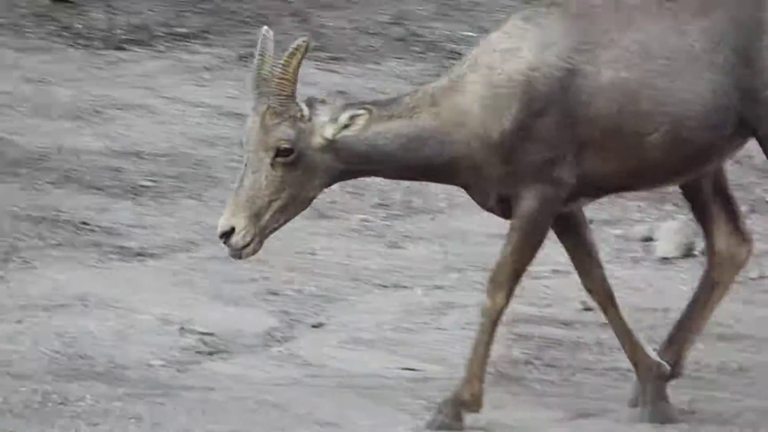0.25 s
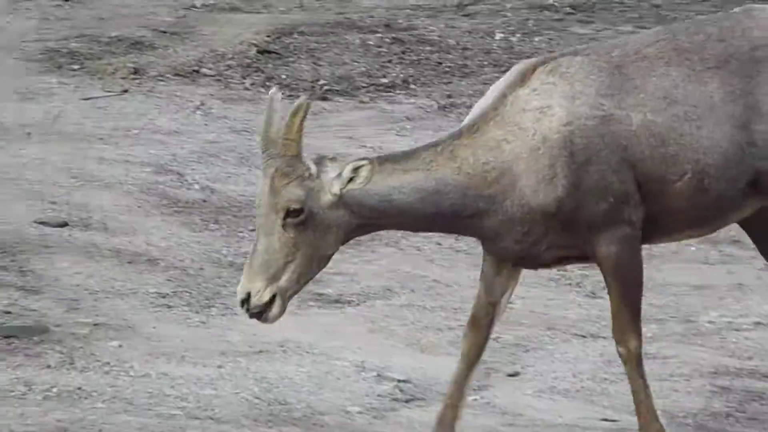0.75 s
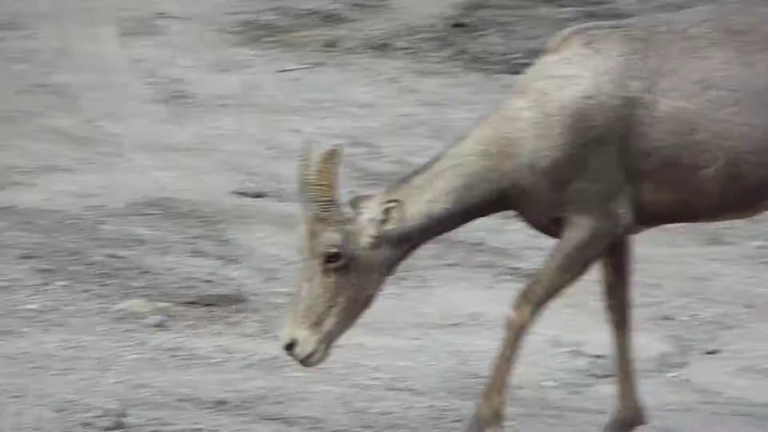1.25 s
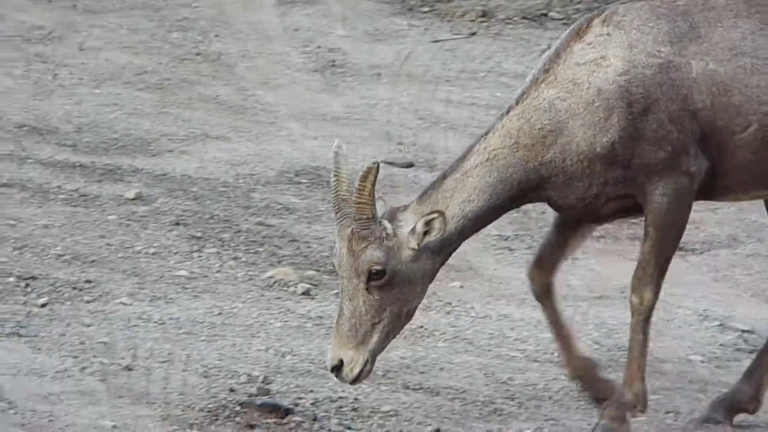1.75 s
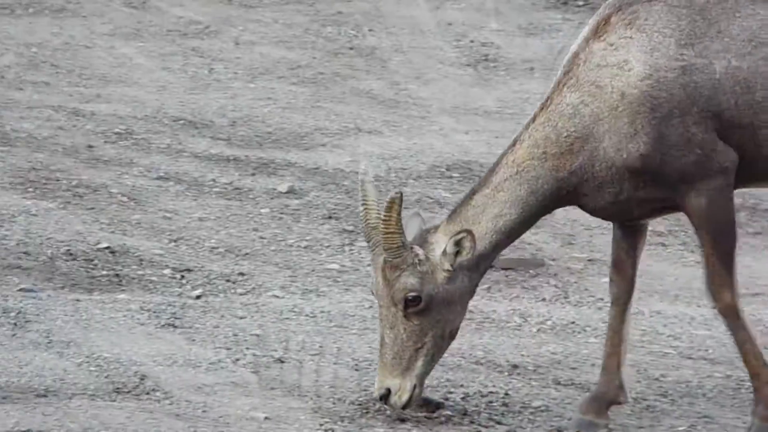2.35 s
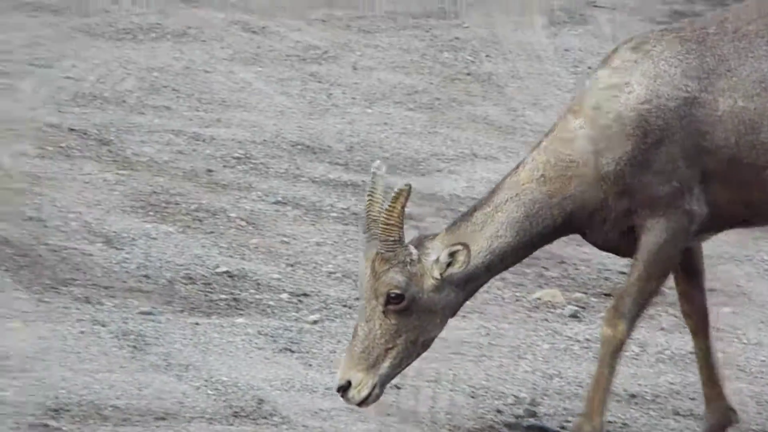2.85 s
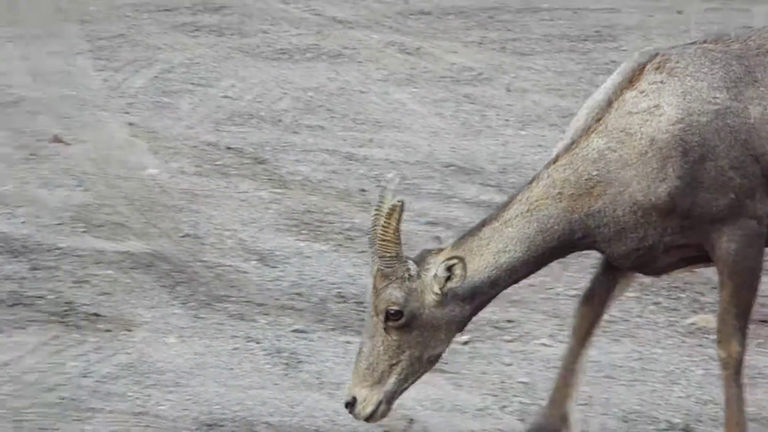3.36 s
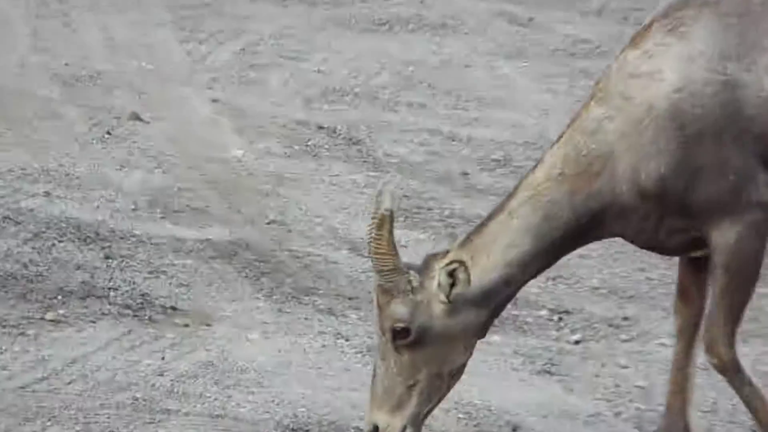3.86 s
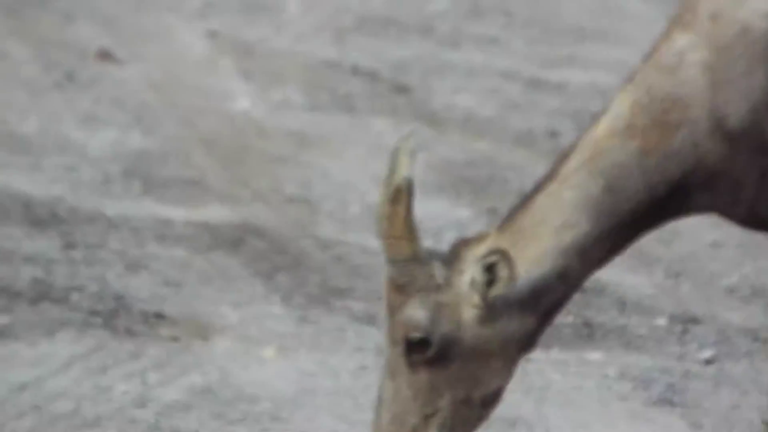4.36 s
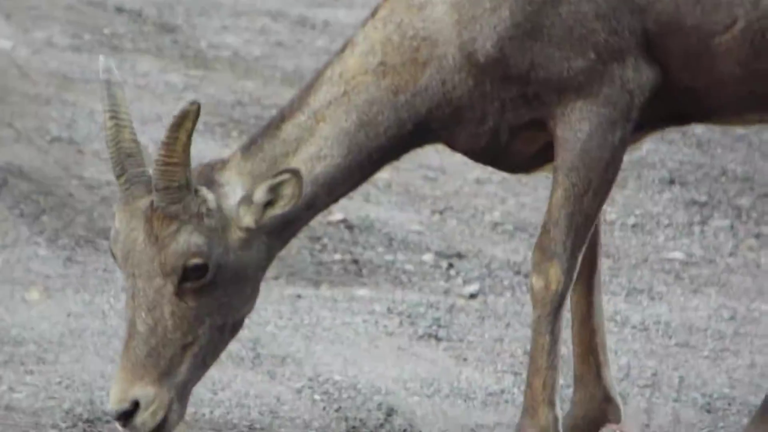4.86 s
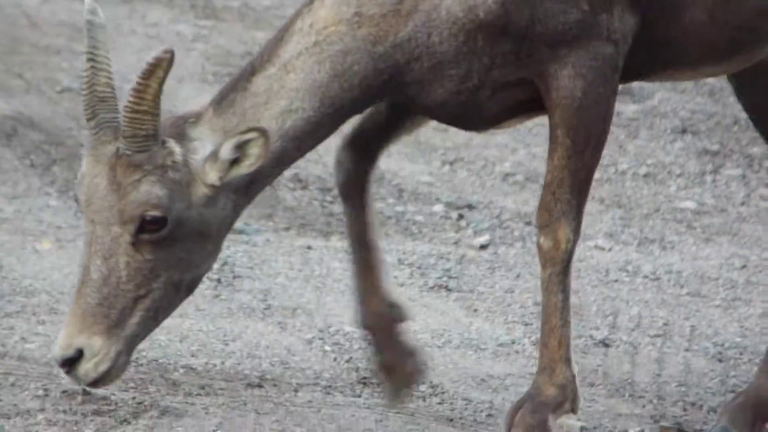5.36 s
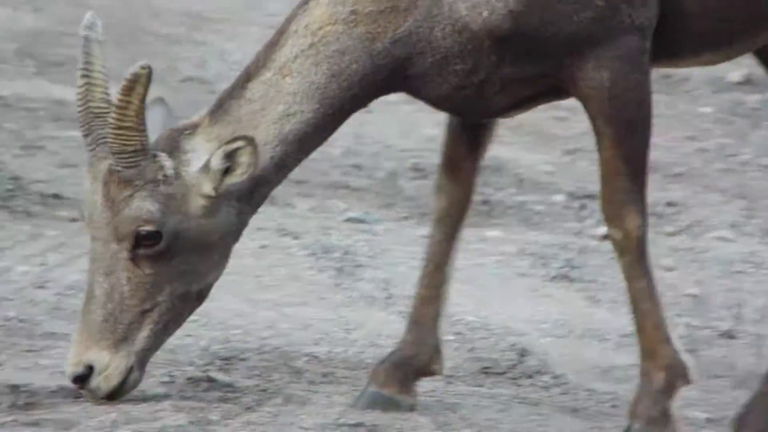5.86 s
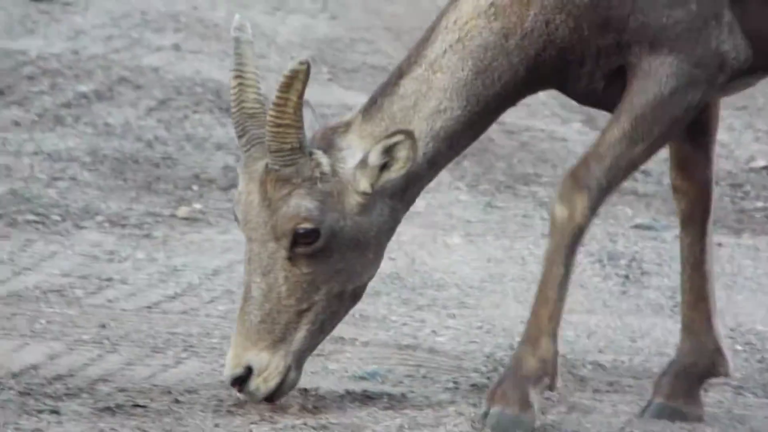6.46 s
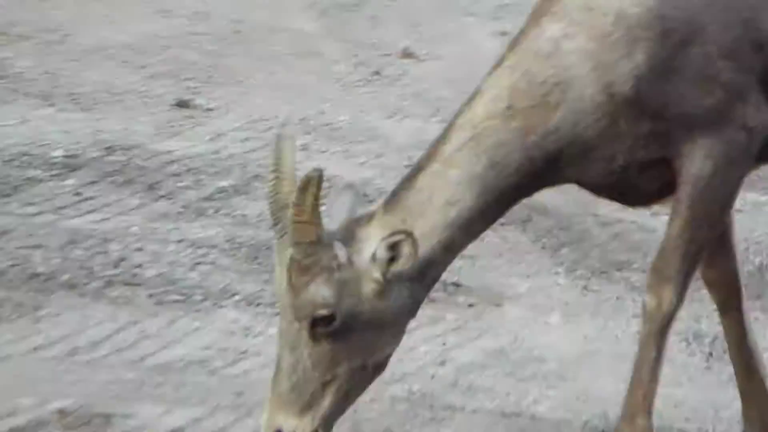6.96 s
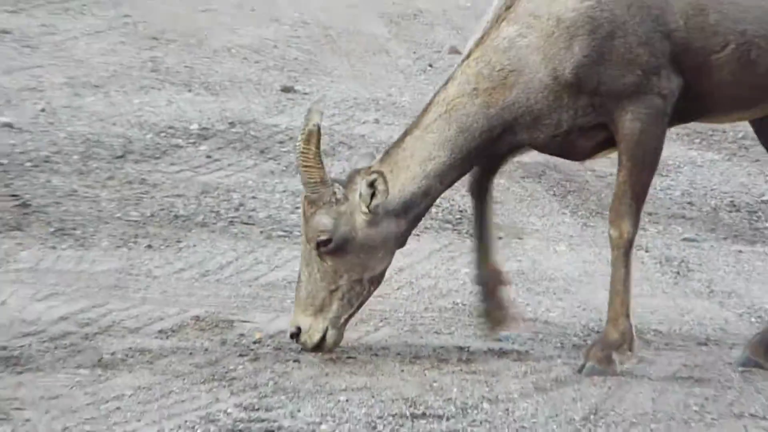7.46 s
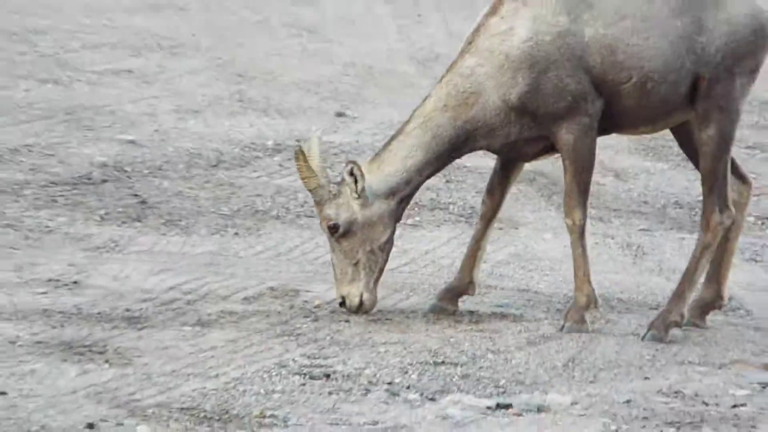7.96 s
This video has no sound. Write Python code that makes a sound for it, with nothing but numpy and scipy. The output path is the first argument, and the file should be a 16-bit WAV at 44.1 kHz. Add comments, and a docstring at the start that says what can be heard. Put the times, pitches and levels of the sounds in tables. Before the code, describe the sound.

A small camera's zoom motor whirs briefly, then longer, amid sharp plastic clicks, creaks and finger rubs over faint distant traffic outdoors.

```python
"""A zoom motor whirs twice, briefly and then for longer, throbbing with each turn of a gear in a
hand-held camcorder. The case clicks, creaks, rubs and bumps; far traffic murmurs and a bird chirps faintly.
Noise through resonators makes the motor, case, fingers and bird; spectrally shaped noise makes the road.
Gain control ducks the loud clicks and a low-pass removes the top."""
import sys
import numpy as np
from scipy import signal
from scipy.fft import rfft, irfft
from scipy.io import wavfile
from scipy.ndimage import uniform_filter1d, minimum_filter1d, map_coordinates

SR = 44100
rng = np.random.default_rng(int(sys.argv[2]) if len(sys.argv) > 2 else 0)


def master(y):
    """Save y as 16-bit WAV."""
    cut = np.clip(np.atleast_2d(y).T, -1, 1)
    pcm = np.round(cut * 32767)  # scale
    wavfile.write(sys.argv[1], SR, pcm.astype(np.int16))


N = 362061
T = np.arange(N) / SR


def from_db(db):
    """Decibels to gain."""
    return 10 ** (np.asarray(db) / 20)


def rms_one(x):
    """Scale to unit rms."""
    return x / np.sqrt(np.mean(x ** 2) + 1e-20)


def at_hz(points, hz):
    """Read a spectrum on a log-frequency axis."""
    point_hz, value = np.transpose(points)
    return np.interp(np.log(hz + 1), np.log(point_hz), value)


def resonate(x, hz, width_hz):
    """Two equal resonators in series: steep skirts, gain 1 on top."""
    r = np.exp(-np.pi * width_hz / SR)
    gain = (1 - r * r) / 2
    section = [gain, 0, -gain, 1, -2 * r * np.cos(2 * np.pi * hz / SR), r * r]
    return signal.sosfilt([section, section], x + 1e-18)


def to_stereo(mid, side, alike):
    """Weight equal-power mid and side so that the channels correlate by alike."""
    return np.sqrt(1 + alike) * mid + np.sqrt(1 - alike) * side * [[1], [-1]]


def pair(size, alike):
    """White noise at the two microphones, partly shared."""
    mid, side = rng.standard_normal((2, size))
    return to_stereo(mid, side, np.clip(alike, -1, 1)) / np.sqrt(2)


def pan(db):
    """Channel gains for a left-over-right difference."""
    return from_db(np.array([[db], [-db]]) / 2)


def add(out, start_s, sound):
    """Mix a sound in at start_s, cut at the end of the scene."""
    i = max(round(start_s * SR), 0)
    out[:, i:i + sound.shape[-1]] += sound[..., :max(N - i, 0)]


def road(start_db=-54.1, fade_db_per_s=.1, drone_hz=119, drone_db=-68):
    """Distant tyres and air as an even, slowly receding murmur, with one engine droning in it."""
    # murmur spectrum: (frequency [Hz], relative level [dB])
    spectrum = [(15, -29.5), (25, 1.5), (91, -4), (119, -5.5), (221, -3.5), (289, -6.5), (399, -7.5),
                (457, -9.5), (552, -8.5), (804, -10), (2630, -23.5), (4380, -27.5), (5430, -25.5),
                (8580, -35.5), (15500, -36)]
    # correlation of the two microphones: (frequency [Hz], correlation [1])
    likeness = [(30, .35), (60, 0.3), (130, .88), (300, 0.9), (700, 0.94), (1400, 0.96), (3100, 0.74),
                (6800, 0.57), (15000, .5)]
    hz = np.arange(N // 2 + 1) * SR / N
    alike = np.clip(at_hz(likeness, hz), 0, 1)
    mid, side = rfft(rng.standard_normal((2, N))) * from_db(at_hz(spectrum, hz))
    murmur = rms_one(irfft(to_stereo(mid, side, alike), N))
    murmur = murmur * from_db(start_db - fade_db_per_s * T)
    drone = rms_one(resonate(rng.standard_normal(N), drone_hz, width_hz=28))
    return (murmur + from_db(drone_db) * drone) * pan(1.4)


def bird(hz=5330, width_hz=650, rise_s=.02, tail_s=.045):
    """Thin far chirps at an even pace: narrow-band noise that swells and dies away exponentially."""
    # bouts: (first chirp [s], gap [s], chirps [count], peak envelope level [dB])
    bouts = [(.55, .425, 6, -66), (4.76, .365, 3, -68)]
    swell = np.zeros(N)
    for first_s, gap_s, count, db in bouts:
        for k in range(round(count)):
            peak_s = first_s + gap_s * k
            swell += from_db(db) * np.exp(-np.maximum((peak_s - T) / rise_s, (T - peak_s) / tail_s))
    return swell * rms_one(resonate(pair(N, alike=0.74), hz, width_hz))


def case(x, body_db=0, edge_db=0):
    """The plastic shell rings in all its modes; the touched spot favours the low or the high ones."""
    # shell modes: (frequency [Hz], width of each resonator [Hz], level before spot colour [dB])
    shell_modes = [(700, 1100, -21.5), (1673, 850, -2.5), (2200, 790, -3), (2790, 730, -4.5),
                   (3260, 570, -7), (4300, 1200, -4.5), (5890, 1200, 0), (6630, 1100, 2.5),
                   (7190, 1200, -2), (9540, 2200, -14.5), (12700, 2200, -24), (13600, 2200, -24.5)]
    out = 0
    for k, (hz, width_hz, db) in enumerate(shell_modes):
        spot_db = np.interp(hz, [2200, 3200, 7200, 9600], [body_db, 0, 0, edge_db])
        spot_db = spot_db + .8 * rng.standard_normal()
        polarity = (-1) ** k
        out = out + polarity * from_db(db + spot_db) * resonate(x, hz, width_hz)
    return out


def rubs_and_knocks(squeak_gain=1.5, squeak_width_hz=700, edge_db=-2.0, knock_t60_s=0.035):
    """Skin drags over the shell in tiny slips with a thin squeak, and now and then bumps it softly; a short
    whir also sounds as the motor starts."""
    # fingers rubbing the case, and last the motor's start-up whir: (start [s], length [s], rms before fades
    # [dB], squeak [Hz])
    rubs = [(3.048, 0.065, -50.5, 6850), (3.13, 0.034, -46, 6600), (4.38, 0.17, -68, 5900),
            (5.76, 0.15, -66, 6000), (5.915, 0.11, -68, 6700), (6.01, .26, -76, 6250),
            (6.637, 0.13, -50.5, 1800)]
    # soft knocks: (start [s], frequency [Hz], level before decay [dB])
    knocks = [(3.654, 480, -43), (3.725, 503, -37), (5.754, 600, -36), (6.151, 180, -33),
              (6.203, 302, -38.5), (6.265, 378, -37.5)]
    out = np.zeros((2, N))
    for start_s, length_s, db, squeak_hz in rubs:
        size = int(length_s * SR)
        slips = pair(size, alike=.4) * from_db(7 * rng.standard_normal(size))
        squeak = squeak_gain * resonate(slips, squeak_hz, squeak_width_hz)
        rub = case(slips, edge_db=edge_db) + squeak
        add(out, start_s, from_db(db) * rms_one(rub) * signal.windows.tukey(size, .3))
    t = np.arange(SR // 8) / SR
    for start_s, hz, db in knocks:
        thud = rms_one(resonate(rng.standard_normal(len(t)), hz, hz / 2))
        add(out, start_s, from_db(db - 60 * t / knock_t60_s) * thud)
    return out


def snap(db, body_db, edge_db, rattle=0.42, alike=0.05, t60_s=.015, ports_alike_hz=1650):
    """A seam slips with a snap and a few milliseconds of rattle; each spot has its own dull or sharp colour."""
    t = np.arange(2048) / SR
    impulse = (t == 0) * 2
    force = impulse + rattle * pair(len(t), alike) * from_db(-60 * t / t60_s)
    ring = case(force, body_db, edge_db)
    mid = ring.mean(axis=0)
    # low pitches reach both microphones alike
    high_pass = signal.butter(4, ports_alike_hz, "high", fs=SR, output="sos")
    side = signal.sosfilt(high_pass, ring - mid)
    return rms_one(mid + side) * from_db(db) * pan(-1.8)


def clicks(ticks_per_s=1.5, tick_db=-70, tick_spread_db=2.0, tick_body_db=3.0, tick_edge_db=0.0):
    """Single snaps of the case, with faint ticks of the case in the hand at random times."""
    # clicks: (start [s], rms before pan [dB], body colour [dB], edge colour [dB])
    click_rows = [(0.884, -62, 13.5, -6), (1.926, -42, 4, -13), (2.2458, -63, -2.5, -10),
                  (2.4781, -61, 15, -9), (2.8563, -54, 17.5, -18), (2.9115, -41.5, -3, -1),
                  (2.9794, -56, 7, -7), (3.1632, -46, 11, -20), (3.236, -31.3, -1.5, 5),
                  (3.5798, -31.5, -7.5, 5), (4.125, -17.3, -4, 0), (4.1321, -31, 6.5, -2),
                  (4.2713, -46.5, 3, -5), (5.7538, -33.5, 4.5, 1), (6.0064, -35, -4, 7),
                  (6.0744, -39.5, -4.5, 9), (6.2089, -35.3, -7, 3), (6.273, -55, 10.5, -7),
                  (6.5098, -62, -6, 7), (6.6745, -42.5, 0, -8), (6.8864, -55, 4.5, 0)]
    out = np.zeros((2, N))
    for start_s, db, body_db, edge_db in click_rows:
        add(out, start_s, snap(db, body_db, edge_db))
    for start_s in rng.uniform(0, N / SR, round(ticks_per_s * N / SR)):
        db = tick_db + tick_spread_db * rng.standard_normal()
        add(out, start_s, snap(db, tick_body_db, tick_edge_db))
    return out


def creaks(slip_gap_s=.0218, slowing_power=5.5, swell_db=2.2, spread_db=1.2):
    """A pressed seam sticks and slips: hardest in the middle of the push, and more slowly towards its end."""
    # creaks: (start [s], first to last slip [s], slips [count], level before swell and spread [dB],
    #          body colour [dB], edge colour [dB])
    creak_rows = [(2.9908, 0.1363, 4, -41, -4.5, -1.5), (5.915, 0.3387, 14, -42.8, -3, 3.5)]
    out = np.zeros((2, N))
    for start_s, length_s, slips, db, body_db, edge_db in creak_rows:
        along = np.linspace(0, 1, round(slips))
        even_s = slip_gap_s * (len(along) - 1)
        times_s = start_s + even_s * along + (length_s - even_s) * along ** slowing_power
        levels_db = db + swell_db * np.sin(np.pi * along) + spread_db * rng.standard_normal(len(along))
        for slip_s, slip_db in zip(times_s, levels_db):
            add(out, slip_s, snap(slip_db, body_db, edge_db))
    return out


def motor_drive(t, run_db, sag_db, surge_db=3.0, surge_s=.03, sag_s=.06, run_up_s=.006, run_down_s=.025):
    """The motor kicks off, sags as it takes up the lens, and runs down at the end."""
    surge = surge_db * np.exp(-t / surge_s)
    sag = sag_db * t / sag_s * np.exp(1 - t / sag_s)
    ramp = np.minimum(np.minimum(t / run_up_s, (t[-1] - t) / run_down_s), 1)
    return from_db(run_db + surge - sag) * ramp


def zoom(run, modes, mesh_db=2.5, flutter_db=2.1, null_hz=3900, null_width_hz=120):
    """Gear teeth scrape and shake the housing; an off-centre wheel loads them once a turn."""
    start_s, stop_s, run_db, sag_db, turns_per_s, start_turn = run
    t = np.arange(0, stop_s - start_s, 1 / SR)
    drive = motor_drive(t, run_db, sag_db)
    turn = 2 * np.pi * (turns_per_s * t + start_turn)
    slack = np.cumsum(rng.standard_normal(len(t))) * 0.051  # backlash blurs the tooth rhythm
    teeth = np.cos(29 * turn + slack)
    shaft = np.cos(5 * turn)
    climb = signal.sawtooth(turn + np.pi)  # pitch climbs and drops back every turn
    out = np.zeros((2, N))
    for hz, width_hz, db, throb_db, sweep in modes:
        scrape = pair(len(t), alike=.25) * from_db(mesh_db * teeth)
        ring = resonate(scrape, hz, width_hz)
        # each mode squeals at a nearly even height
        ring = ring / (uniform_filter1d(ring ** 2, size=128) + 1e-9) ** (1 / 3)
        bent = np.cumsum(1 + sweep * climb)  # warped read positions, in samples
        ring = np.array([map_coordinates(channel, [bent], order=3, mode="mirror") for channel in ring])
        ring = ring * from_db(flutter_db * shaft + throb_db * np.cos(turn))
        add(out, start_s, from_db(db) * drive * rms_one(ring))
    # the housing has a dead band between its low and high modes
    b, a = signal.iirnotch(null_hz, null_hz / null_width_hz, fs=SR)
    return signal.lfilter(b, a, out + 1e-18) * pan(4.0)


def scene():
    """The camera's own noises lie close and dry over the outdoor air."""
    # motor runs: (start [s], stop [s], drive level [dB], sag under load [dB], gear speed [turns/s],
    #              gear angle at the start [turns])
    run_in = (3.636, 4.332, -46.6, 1.0, 17.8, 0.32)
    run_out = (6.639, 8.22, -44, 4.5, 18.55, 0.14)
    # housing modes by direction of travel: (frequency [Hz], width of each resonator [Hz], level [dB],
    #                                        throb [+-dB], pitch sweep per turn [+-share])
    in_modes = [(1794, 280, -9, 5, 0.049), (2620, 700, -15, -1.5, .04), (3223, 360, -8.5, 1.5, .055),
                (4603, 400, -1, .8, 0.019), (5580, 980, -4, -0.2, .008), (6700, 980, -3.5, 2.1, 0.0075),
                (8300, 1800, -16.5, -0.5, 0.0092), (11300, 1500, -24, -2, .01)]
    out_modes = [(1710, 960, -21.5, 1.5, 0.0098), (2640, 200, -12.7, 4.2, 0.065),
                 (3140, 330, -13, 3.2, 0.065), (4770, 330, -0.5, 0.28, .004), (5330, 620, -6, 0.61, 0.0035),
                 (6570, 1150, -3, 2.7, .004), (8130, 1500, -15.5, 1, 0.0026), (11270, 920, -28, 1, .004)]
    outdoors = road() + bird()
    handling = rubs_and_knocks() + creaks() + clicks()
    return outdoors + handling + zoom(run_in, in_modes) + zoom(run_out, out_modes)


def record(dry, threshold_db=-20.0, attack_s=0.011, release_db_per_s=105, held_db=1.8, hold_s=.5,
           cutoff_hz=15800):
    """Gain control ducks loud clicks, releases fast but holds the last held_db longer; the top is cut."""
    power = uniform_filter1d(np.mean(dry ** 2, axis=0), size=256)
    level_db = 10 * np.log10(np.maximum(power, 0) + 1e-12)
    over_db = np.maximum(level_db - threshold_db, 0)
    half = int(hold_s * SR / 2)
    # running maximum over the past hold_s
    held = -minimum_filter1d(-np.minimum(over_db, held_db), size=2 * half + 1, origin=half)
    fall = release_db_per_s * T
    released = np.maximum.accumulate(over_db + fall) - fall
    duck_db = np.maximum(released, held)
    r = np.exp(-1 / (attack_s * SR))
    ducked = dry * from_db(-signal.lfilter([1 - r], [1, -r], duck_db))
    low_pass = signal.ellip(10, .1, 70, cutoff_hz, fs=SR, output="sos")
    return signal.sosfilt(low_pass, np.tanh(ducked))


dry = scene()
out = record(dry)
master(out)
```